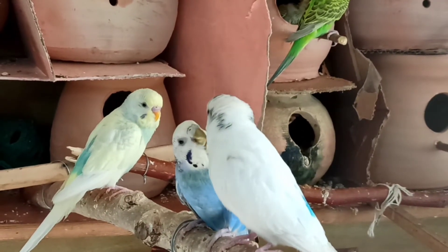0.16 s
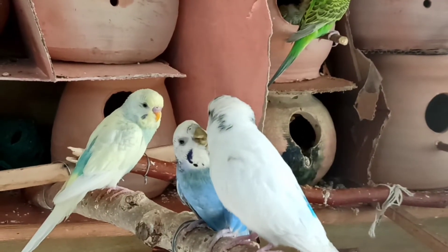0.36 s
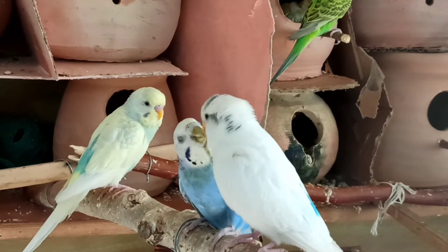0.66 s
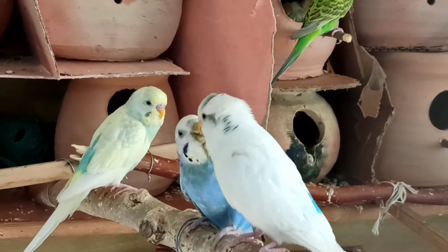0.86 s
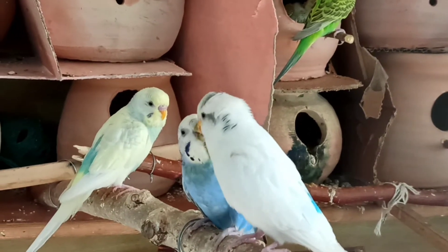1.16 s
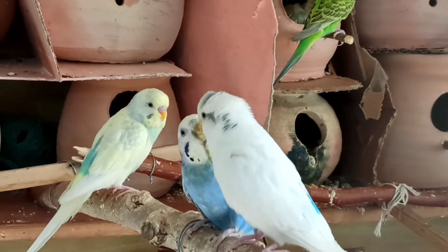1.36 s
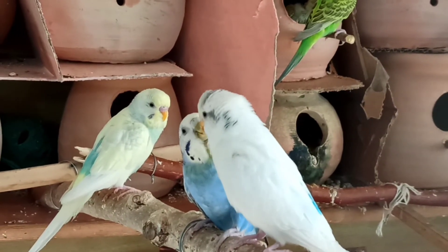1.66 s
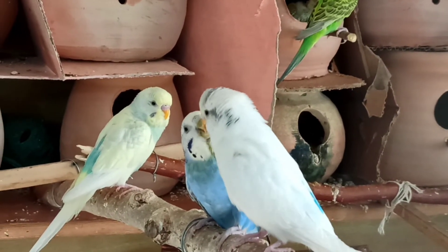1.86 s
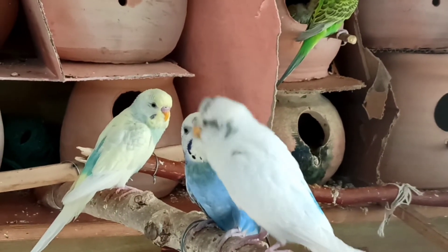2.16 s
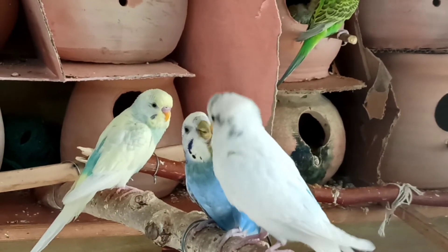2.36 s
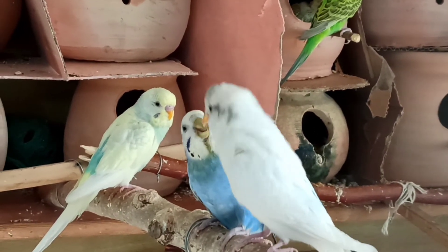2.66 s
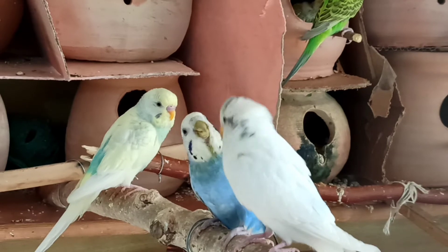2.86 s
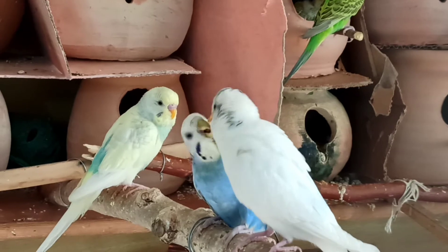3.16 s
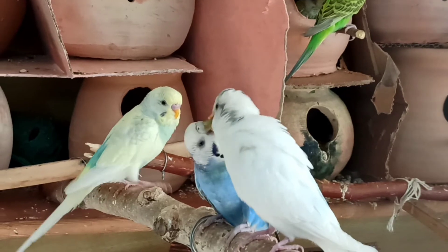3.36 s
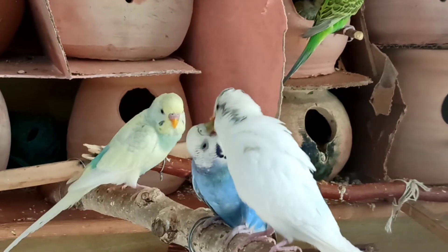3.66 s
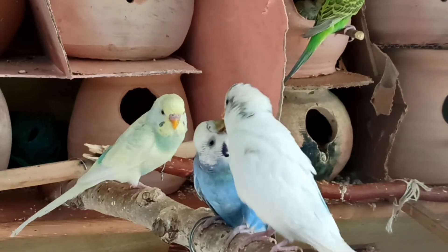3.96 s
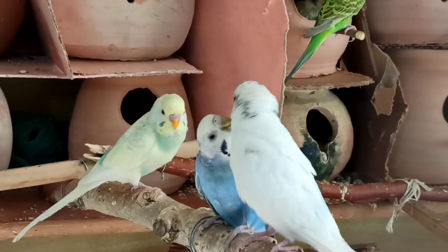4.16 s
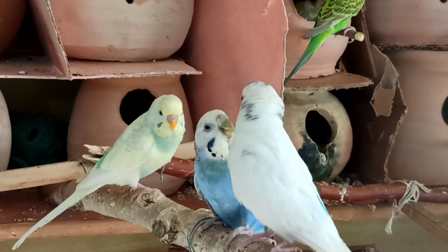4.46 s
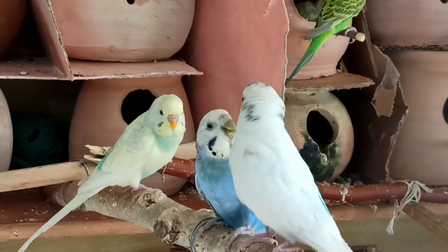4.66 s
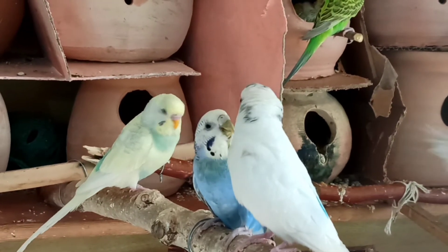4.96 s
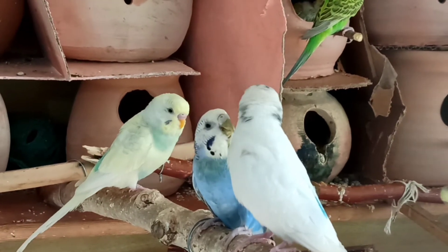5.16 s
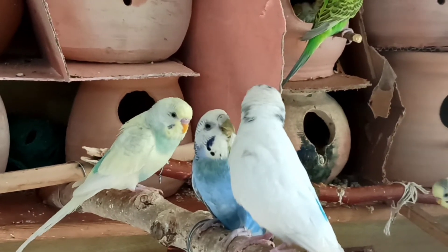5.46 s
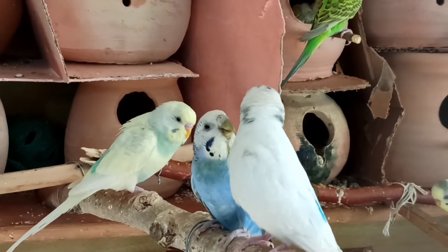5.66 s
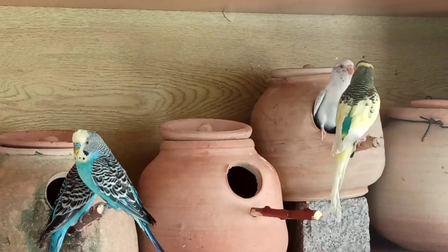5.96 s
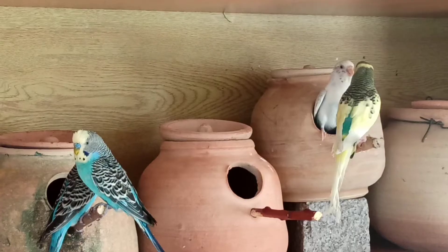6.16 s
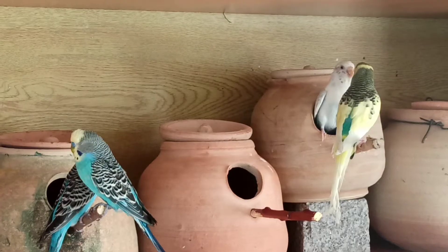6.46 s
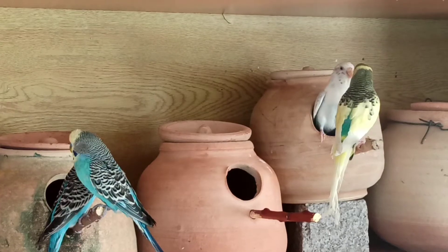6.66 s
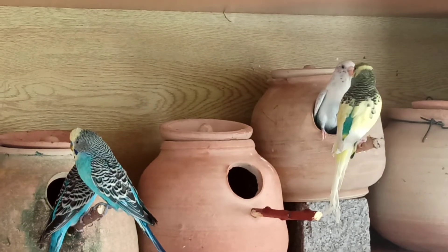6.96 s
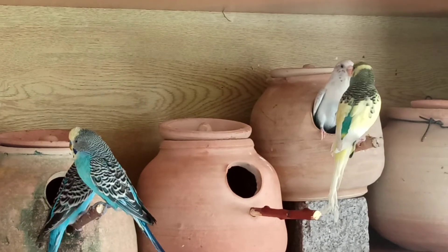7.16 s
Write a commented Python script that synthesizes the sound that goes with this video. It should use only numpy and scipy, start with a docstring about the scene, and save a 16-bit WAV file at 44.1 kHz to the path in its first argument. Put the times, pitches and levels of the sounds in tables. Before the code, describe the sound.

Small parrots in an aviary, heard by a close stereo microphone. Harsh dry rasps repeat at the centre from the start, pausing around two seconds for buzzy trills and a clear whistle leaning left, then a loud leaping chirp. Rasping returns in clusters, with short whistles and perch ticks. Towards the end a busy flurry of small chirps takes over. Far chatter, open-air hiss and light wind rumble continue throughout.

```python
"""Small parrots in an aviary: harsh scolding rasps close by, loud warbled chirps, whistles and buzzy trills
left and right, ticks, soft hoots, a far chatter, open-air hiss, a thin hum and wind rumbling on the microphone.
Rasps are bursts gating shaky tones and breath noise; chirps are overtones plus breath; whistles are near sines;
trills are chopped sines; ticks are snaps of filtered noise; chatter is a crowd of short bent notes.
Hiss and wind are shaped noise; sparse decaying echoes make the aviary."""
import sys
import numpy as np
from scipy import signal
from scipy.io import wavfile
from scipy.ndimage import uniform_filter1d

SR = 44100
rng = np.random.default_rng(int(sys.argv[2]) if len(sys.argv) > 2 else 0)


def pcm_store(signal):
    """Save signal as 16-bit PCM."""
    levels = np.round(np.clip(np.atleast_2d(signal), -1, 1) * 32767)
    wavfile.write(sys.argv[1], SR, levels.astype(np.int16).T)


def rack_gain(trim_db):
    """Turn a fader trim in dB into the linear factor to multiply a signal by."""
    fader = np.asarray(trim_db, float)
    return 10 ** (fader / 20)


N = 321489

# Open-air hiss spectrum. Each row: frequency in Hz, relative density in dB per Hz.
AIR_COLOUR = [(24, -58), (40, -48), (118, -63.5), (402, -28), (455, -17.5), (770, 2.5), (1440, -0.5),
              (1720, 1), (3380, -2), (5310, -4), (7360, -3), (13800, -10.5), (16000, -13)]
AIR_DB = -38
# Left-right likeness of the hiss. Each row: frequency in Hz, likeness from 0 to 1.
AIR_LIKENESS = [(60, 0.98), (180, 0.4), (550, 0.48), (1650, 0.66), (4970, 0.35), (15000, 0.043)]
# Wind level. Each row: time in seconds, level in dB.
WIND_LEVEL = [(0.0, -46), (0.08, -58), (0.12, -62), (0.3, -61), (0.36, -54.5), (0.93, -44), (1.12, -66),
              (1.68, -60), (2.01, -47.5), (2.33, -66), (3.44, -60), (4.03, -67), (4.24, -43), (4.58, -39),
              (4.95, -61.5), (5.17, -50), (5.27, -65.5), (7.28, -62.5)]
# Wind spectrum. Each row: frequency in Hz, relative density in dB per Hz.
WIND_COLOUR = [(18, -61), (30, -34), (48, -35), (85, 5.5), (108, -17), (146, -0.5), (600, -17), (780, -44),
               (1320, -120)]
# The wind rings one low resonance; level relative to the gusts.
MOAN_HZ, MOAN_WIDTH_HZ, MOAN_REL_DB = 97.2, 4.3, -10.5
HUM_HZ, HUM_DB = 1726, -55

# Far flock, before its direct and echo gains. Each row: time in seconds, level in dB.
CHATTER_LEVEL = [(0.0, -41.5), (0.87, -41.5), (2.27, -49.5), (2.56, -42.5), (2.9, -43), (5.16, -50),
                 (6.29, -42), (7.29, -42.5)]
FAR_DIRECT_DB, FAR_ECHO_DB = -6, -3
# Aviary decay. Each row: frequency in Hz, time to fall 60 dB in seconds.
AVIARY_T60 = [(1000, 0.033), (3000, 0.27), (7000, 0.26), (14000, 0.12)]

# Low soft hoots far off. Each row: start in seconds, length in seconds, settled level in dB,
# first pitch in Hz, last pitch in Hz, left over right in dB.
HOOTS = [(0.097, 0.095, -47.5, 309, 362, 0), (3.065, 0.18, -64, 325, 321, 0),
         (3.368, .26, -64, 334, 297, -2)]
# Short whistles, one glide each. Columns as for the hoots.
WHISTLES = [(0, 0.024, -35.5, 2950, 2840, 5), (0.047, 0.11, -46.5, 2950, 2900, 12),
            (.17, 0.053, -40, 3040, 2845, 7), (0.247, .02, -38, 1350, 1600, -2),
            (.265, 0.029, -39, 1515, 1140, -2), (.34, .13, -40.5, 1495, 1464, -2),
            (0.38, 0.023, -33, 1715, 1490, -2), (1.235, 0.036, -34, 2860, 3300, 0),
            (1.322, 0.021, -31, 3425, 3240, 0), (1.434, 0.0082, -29.5, 3540, 2790, 0),
            (1.52, .025, -35.5, 2650, 3160, 0), (1.954, 0.11, -42, 8230, 7820, 26),
            (2.04, 0.074, -43.5, 3906, 3835, 4), (2.067, 0.038, -41.5, 2410, 2250, 0),
            (2.332, .05, -45, 3380, 3300, 0), (2.368, 0.066, -45.5, 1200, 1435, 0),
            (2.439, 0.028, -31, 3710, 3500, -2), (2.507, 0.034, -36, 1785, 1750, -2),
            (2.97, 0.036, -38.5, 1450, 1453, 0), (3.45, 0.024, -38, 2790, 2760, 0),
            (3.647, 0.046, -42, 4050, 4190, -1), (3.677, .03, -40, 1550, 1620, 0),
            (3.717, 0.028, -36, 4170, 4400, -1), (3.75, 0.044, -44, 4640, 4720, 0),
            (3.775, 0.028, -29.5, 2680, 4290, 0), (3.884, 0.031, -47, 4610, 4700, 5),
            (3.989, 0.045, -40, 2640, 2280, 1), (4.062, 0.044, -38, 2730, 2200, 0),
            (4.708, .03, -40.5, 2380, 2420, -7), (5.171, 0.014, -35, 4120, 4150, 0),
            (5.314, 0.088, -50, 1416, 1116, -3), (5.76, 0.041, -42, 5130, 4950, -24),
            (5.307, 0.034, -42, 5350, 4720, -22), (5.561, 0.0444, -35.5, 3520, 2860, -1),
            (5.595, 0.044, -41.5, 4960, 5100, -28), (4.566, 0.089, -47.5, 6200, 5000, -20),
            (4.712, .035, -49, 4840, 4750, -22), (4.91, 0.032, -53, 4300, 4250, -20),
            (5.007, 0.086, -54, 5240, 5350, -20), (6.02, .05, -46, 5140, 4800, -20),
            (6.43, 0.071, -43.5, 3020, 3350, -18), (6.595, .045, -40.5, 4770, 5200, -22),
            (0.582, 0.066, -43, 2600, 2950, 10), (0.988, 0.128, -43.5, 2890, 2950, 12),
            (1.29, 0.044, -39, 2605, 2650, 0), (1.56, .04, -46, 2840, 3050, 0),
            (4.182, 0.042, -37.5, 2600, 2350, 0), (5.861, 0.035, -43, 2530, 2800, 0),
            (5.871, 0.011, -31, 4140, 4350, 0), (5.887, 0.025, -35, 3320, 2930, 0),
            (5.899, 0.057, -39, 4870, 4630, -12), (5.924, 0.014, -33, 2010, 2320, 0),
            (5.939, .025, -33, 2414, 3390, -1), (5.975, 0.015, -37, 4000, 4400, 0),
            (5.964, 0.019, -36, 2035, 2035, -2), (5.999, 0.031, -33, 2425, 3190, 0),
            (6.003, 0.029, -37, 5200, 6360, 0), (6.013, 0.029, -33.5, 6450, 6470, -1),
            (6.061, 0.026, -38.5, 2650, 3220, -2), (6.083, .085, -46, 2600, 2410, -3),
            (6.089, 0.03, -39.5, 3650, 3640, 0), (6.173, .04, -42, 3000, 3000, 0),
            (6.21, 0.076, -42, 1200, 1135, -2), (6.33, .04, -43, 2790, 2680, -13),
            (6.515, .015, -38, 3950, 3600, 0), (6.567, 0.044, -41, 2600, 2880, 0),
            (6.639, 0.053, -40, 3410, 3080, -24), (6.715, .015, -40, 4810, 4700, -15),
            (6.757, 0.12, -44, 3430, 3240, 0), (6.789, 0.014, -39, 4890, 4650, -20),
            (6.99, 0.023, -46, 5450, 5400, -15), (7.02, .04, -36.5, 3300, 3450, 0),
            (6.529, 0.034, -40, 3090, 2690, -3), (7.02, 0.083, -42, 2600, 2436, -6),
            (7.203, 0.11, -45, 8050, 7430, -24), (7.208, 0.038, -37, 2900, 3400, 0)]
# Hoots and short whistles settle at this share of the length; start and end relative to the settled level.
SETTLE_SHARE, GLIDE_START_REL_DB, GLIDE_END_REL_DB = 0.091, 6, -3.5
# Longer whistled phrases. Each row: left over right in dB, then a list of points:
# time in seconds, pitch in Hz, level in dB.
PHRASES = [(6, [(1.14, 818, -43.5), (1.22, 870, -48), (1.28, 840, -50), (1.36, 880, -49.5),
           (1.45, 871, -50), (1.52, 850, -48), (1.65, 825, -50.5)]), (15, [(2.44, 5300, -28.5),
           (2.48, 5790, -27.5), (2.53, 5740, -36), (2.6, 5650, -39), (2.69, 5860, -54)]),
           (-1, [(2.47, 3190, -30), (2.5, 3607, -25.5), (2.53, 3620, -27), (2.58, 3640, -42)]),
           (17, [(2.582, 4120, -29), (2.6, 4115, -19), (2.655, 4135, -25), (2.7, 4160, -38),
           (3.1, 4205, -51.5)]), (0, [(3.18, 3680, -49), (3.22, 3370, -37), (3.26, 3325, -34),
           (3.3, 3350, -41)]), (5, [(3.43, 3390, -39), (3.5, 3086, -40), (3.53, 2800, -43),
           (3.58, 2810, -39)]), (0, [(3.6, 2850, -50), (3.67, 3000, -41), (3.7, 3200, -32.5),
           (3.72, 2900, -39), (3.745, 2750, -39)]), (0, [(3.73, 2140, -37.5), (3.77, 2420, -37.5),
           (3.81, 2316, -42), (3.93, 2520, -43.5)]), (-27, [(6.18, 4150, -63), (6.25, 4710, -42),
           (6.28, 5340, -51), (6.31, 4940, -45)]), (3, [(6.2, 2616, -35.5), (6.24, 2166, -43),
           (6.3, 2286, -39), (6.35, 2200, -44)])]
FLUTTER_DB = 2.5

# Buzzy trills. Each row: start in seconds, length in seconds, top level in dB, averaged over the chopping,
# pitch in Hz, left over right in dB.
TRILLS = [(2.11, .27, -28.5, 6024, 17), (2.285, 0.38, -25.5, 4065, 15)]
TRILL_PER_S = 230  # nominal
TRILL_RISE_S, TRILL_START_REL_DB, TRILL_FALL_DB_PER_S = 0.041, -11, 79

# Beaks and claws tick on perches. Each row: time in seconds, peak in dB, left over right in dB.
TICKS = [(1.5494, -33, -7), (1.829, -27, -7), (4.8206, -27.5, -15), (5.096, -26.5, -21),
         (5.2533, -15.5, 23), (6.705, -25.5, -22), (6.9486, -30, -12)]

# A bird on the right repeats one rough rising note.
REPEAT_FIRST_S, REPEAT_LENGTH_S, REPEAT_SPACING_S = 5.085, .04, .203
REPEAT_FROM_HZ, REPEAT_TO_HZ = 3500, 4150
REPEAT_DB, REPEAT_ROUGH, REPEAT_LEFT_DB = -39, .5, -20  # roughness 0-1

# Loud warbled chirps. Each row: left over right in dB, then a list of points:
# time in seconds, pitch in Hz, level in dB, roughness from 0 to 1.
CHIRPS = [(2, [(2.692, 2770, -25, 0.1), (2.698, 2640, -23, 0), (2.7, 4900, -23, 0), (2.703, 2890, -25, 0.1),
          (2.706, 2970, -31, 0.3), (2.708, 4950, -12, 0.05), (2.711, 2820, -35, 0.2), (2.713, 5140, -12, 0),
          (2.718, 5150, -9.5, 0.07), (2.722, 4260, -28, 0), (2.733, 4990, -8, 0)]),
          (1.7, [(2.735, 4135, -32, 0.6), (2.745, 2980, -23.5, 0.05), (2.755, 2593, -18.5, 0),
          (2.779, 2473, -22, 0), (2.781, 4690, -10, 0), (2.783, 5150, -7, 0.15), (2.786, 6330, -10, 0.27),
          (2.792, 4910, -14.5, 0.15), (2.795, 3160, -15.5, 0), (2.799, 4990, -14, 0.1),
          (2.806, 5080, -15, 0.06), (2.815, 4750, -24, 0.2)]), (0, [(2.818, 4740, -25, 0.27),
          (2.83, 4880, -23, 0.07), (2.84, 4760, -16.5, 0.03), (2.855, 4410, -23, 0.2),
          (2.87, 4200, -39, 0.2)]), (-0.5, [(7.018, 4130, -39, 0.1), (7.036, 3760, -36, 0.14),
          (7.052, 4150, -23, 0.3), (7.062, 4600, -29, 0.77), (7.085, 4350, -24, 0.82),
          (7.105, 4280, -33, 1)])]
# Throat response to the overtones. Each row: frequency in Hz, gain in dB.
CHIRP_THROAT = [(2000, -3), (2700, -4), (5000, -1.5), (7500, -5.5), (10000, -15), (13000, -13.5),
                (16000, -67)]

# Harsh rasps. Each row: start in seconds, swell in seconds, level at the onset in dB, level after the swell
# in dB, lower resonance relative to upper in dB, upper throat resonance in Hz, lower throat resonance in Hz.
RASPS = [(0.164, 0.029, -37, -40, 6, 6430, 3460), (0.316, 0.055, -31, -21.5, -9.5, 6550, 3900),
         (0.464, 0.026, -18.5, -25.5, -7.5, 6380, 4000), (.5, 0.057, -31, -26, -5, 6380, 4138),
         (.618, 0.056, -24, -25.5, 0.5, 6520, 3840), (.72, 0.059, -33, -30, 2, 6440, 4030),
         (.765, 0.033, -23.5, -25.5, -3.5, 6360, 4230), (.82, 0.06, -32, -30.5, -8.5, 6350, 3760),
         (.93, 0.06, -20, -26, -5, 6460, 4420), (1.056, 0.059, -24, -25, -3, 6450, 4110),
         (1.189, 0.048, -23, -24, -8, 6400, 3600), (1.317, 0.044, -21, -25.5, -7.5, 6610, 3720),
         (1.619, 0.052, -23, -23.5, -8.5, 6540, 3960), (2.961, 0.043, -40, -31.5, 2, 6580, 4170),
         (3.211, 0.044, -31, -24.5, -6, 6540, 3720), (3.33, 0.06, -22.5, -25, -9.5, 6360, 3600),
         (3.784, 0.024, -39, -41, 10.5, 6990, 3330), (4.012, 0.039, -22, -26.5, -7.5, 6610, 4060),
         (4.127, .085, -21, -26.5, -7, 6770, 3750), (4.245, 0.025, -19.5, -23, -10, 6240, 4160),
         (4.43, 0.056, -26, -26.5, -2, 6170, 3730), (5.149, 0.012, -30, -30.5, -1, 6370, 3700),
         (5.25, 0.011, -32, -38.5, 6.5, 6540, 3450), (5.437, 0.019, -28, -25.5, -6.5, 6270, 4550),
         (5.463, 0.011, -28, -31.5, 7, 6700, 3300), (5.872, 0.009, -39, -37.5, 3, 6400, 3560),
         (5.94, 0.055, -39, -43.5, 8.5, 6440, 3620), (6.36, 0.06, -29, -35, -5.5, 6620, 3770),
         (6.451, 0.021, -29, -33.5, -6, 6270, 3540), (6.61, .03, -38, -38.5, 0, 6200, 3720)]
# Breath in the lower throat. Each row: multiple of the lower resonance, width in Hz, relative level in dB.
LOWER_THROAT = [(1.0, 1610, 40.5), (1.25, 400, 28.5), (.68, 300, -37)]
# Resonances of the head, drifting as it moves. Each row: centre in Hz, width in Hz, relative level in dB.
HEAD = [(5470, 160, -3.5), (7364, 260, 0), (8310, 240, -4.5), (11800, 500, -19), (13100, 1300, -11.5),
        (4540, 120, -3)]
HEAD_DRIFT = .035  # rms share of the centre
UPPER_WIDTH_HZ = 930
RASP_START_PER_S, RASP_LATER_PER_S = 190, 380  # nominal burst rates
RASP_LEFT_DB, RASP_RISE_S = -0.5, 0.0061
# The voice breaks off, then dies away; longer rasps more slowly. Both drops are below the level after the swell.
RASP_CUT_S, RASP_CUT_DROP_DB = 0.018, 4.5
RASP_FALL_S, RASP_FALL_PER_SWELL, RASP_FALL_DROP_DB = 0.027, 1.3, 18
LOWER_FOLLOWS = 0.71  # share of the change in effort, in dB, that reaches the lower resonance

FADE_S = .004
LOW_CUT_HZ, MONO_BELOW_HZ, EDGE_HZ = 112, 460, 15900
KNEE, CEILING = .6, .92  # full scale = 1


def evened(x):
    """Scales to rms 1."""
    return x / np.sqrt(np.mean(x ** 2) + 1e-20)


def read(points, hz):
    """Reads a table against log frequency."""
    f, value = np.transpose(points)
    return np.interp(np.log(hz + 1), np.log(f + 1), value)


def level_over_time(points):
    """Level in dB at every sample of the scene."""
    return np.interp(np.arange(N) / SR, *np.transpose(points))


def curves(rows):
    """Start time and each column of a table, sample by sample."""
    s, *columns = np.transpose(rows)
    t = np.arange(s[0], s[-1], 1 / SR)
    return s[0], [np.interp(t, s, c) for c in columns]


def wobble(n, size):
    """Smooth random drift of rms 1; size in samples."""
    return evened(uniform_filter1d(uniform_filter1d(rng.standard_normal(n), size), size))


def phase(hz):
    """Running phase in radians of a pitch curve."""
    return 2 * np.pi * np.cumsum(hz) / SR


def add(mix, s, sound, left_db, fade_s=FADE_S):
    """Places a sound left or right, with soft ends."""
    sound = sound * signal.windows.tukey(len(sound), min(1, 2 * fade_s * SR / len(sound)))
    ratio = rack_gain(left_db)
    pair = np.array([2 * ratio / (1 + ratio) * sound, 2 / (1 + ratio) * sound])
    part = mix[:, round(s * SR):][:, :len(sound)]
    part += pair[:, :part.shape[1]]


def resonate(x, hz, width_hz):
    """Moving resonance: shifts the curve hz down to zero, smooths twice, shifts back."""
    turn = np.exp(1j * phase(hz * np.ones(len(x))))
    r = np.exp(-np.pi * width_hz / SR)
    return 2 * (turn * signal.lfilter([(1 - r) ** 2], [1, -2 * r, r * r], x / turn)).real


def noise(colour, likeness, patchy_db):
    """Two channels of coloured noise with drifting patches, rms 1."""
    frames, hz = N // 256 + 5, np.fft.rfftfreq(1024, 1 / SR)
    a, b, c, d, patches = rng.standard_normal((frames, 513, 5)).T
    patches = evened(uniform_filter1d(uniform_filter1d(patches, 12, 0), 10, 1))
    same = np.clip(likeness(hz), -1, 1)[:, None]
    left = a + 1j * b
    right = same * left + np.sqrt(1 - same ** 2) * (c + 1j * d)
    z = np.array([left, right]) * rack_gain(read(colour, hz)[:, None] + patchy_db * patches)
    return evened(signal.istft(z, nperseg=1024, noverlap=768)[1][:, :N])


def hiss():
    """Open-air hiss: patchy shaped noise, partly shared by the two channels."""
    return rack_gain(AIR_DB) * noise(AIR_COLOUR, lambda hz: read(AIR_LIKENESS, hz), patchy_db=1.83)


def wind():
    """Gusts on the microphone: low noise, alike left and right, plus one ringing resonance."""
    gusts = noise(WIND_COLOUR, np.ones_like, patchy_db=3)
    moan = evened(resonate(rng.standard_normal(N), MOAN_HZ, MOAN_WIDTH_HZ))
    return rack_gain(level_over_time(WIND_LEVEL)) * (gusts + rack_gain(MOAN_REL_DB) * moan)


def hum():
    """A thin sine wavering in level and phase."""
    level = rack_gain(HUM_DB + 2.6 * wobble(N, size=4000))
    return level * np.sin(2 * np.pi * HUM_HZ * np.arange(N) / SR + 0.21 * wobble(N, size=3000))


def chatter(count=1000):
    """Far birds: a crowd of short bent, warbled notes at random moments and places."""
    mix = np.zeros((2, N))
    for when, pitch, slope, bend, length, size, side in rng.random((count, 7)):
        t = np.linspace(-1, 1, int((0.0135 + 0.0345 * length) * SR))
        octaves = 1.4 * pitch + .35 * (slope - .5) * t + .35 * (bend - .5) * t ** 2
        note = np.sin(phase(1700 * 2 ** octaves)) * np.cos(np.pi * t / 2)
        add(mix, when * N / SR, rack_gain(9 * size) * note, 16 * (side - .5))
    return evened(mix) * rack_gain(level_over_time(CHATTER_LEVEL))


def aviary(x, same):
    """Sparse echoes of random sign, each band dying at its own speed, different in each ear."""
    taps = np.zeros((2, SR // 2))
    at = np.arange(150, SR // 2 - 20, 20) + rng.integers(0, 20, (2, (SR // 2 - 151) // 20))
    np.put_along_axis(taps, at, rng.choice([-1., 1.], at.shape), 1)
    taps[1] = same * taps[0] + np.sqrt(1 - same ** 2) * taps[1]
    hz, t, z = signal.stft(taps, SR, nperseg=256)
    decay = rack_gain(-60 * t / read(AVIARY_T60, hz)[:, None])
    tail = signal.istft(z * decay, SR, nperseg=256)[1]
    return signal.oaconvolve(x, tail / np.linalg.norm(tail[0]), axes=1)[:, :N]


def glide(s, length_s, settled_db, from_hz, to_hz):
    """Points of one straight glide that starts with a push, settles and fades."""
    return [(s, from_hz, settled_db + GLIDE_START_REL_DB),
            (s + SETTLE_SHARE * length_s, from_hz + SETTLE_SHARE * (to_hz - from_hz), settled_db),
            (s + length_s, to_hz, settled_db + GLIDE_END_REL_DB)]


def whistle(rows):
    """A near sine that wavers in pitch and strength, with a faint octave."""
    s, (hz, db) = curves(rows)
    n = len(hz)
    turn = phase(hz * (1 + .005 * wobble(n, size=200)))
    db = db + FLUTTER_DB * wobble(n, size=500) + 2.4 * wobble(n, size=150)
    tone = np.sin(turn) + rack_gain(-38) * np.sin(2 * turn)
    return s, np.sqrt(2) * rack_gain(db) * tone


def trill(s, length_s, top_db, hz, left_db):
    """A whistle chopped by a second, slower and uneven vibration."""
    t = np.arange(0, length_s, 1 / SR)
    rise_db = TRILL_START_REL_DB * (1 - t / TRILL_RISE_S)
    fall_db = TRILL_FALL_DB_PER_S * (TRILL_RISE_S - t)
    beat = phase(TRILL_PER_S * (1 + 0.178 * wobble(len(t), size=300)))
    turn = phase(hz * (1 + 0.017 * np.sin(beat) + 0.013 * wobble(len(t), size=100)))
    chopped = evened((1 + .6 * np.cos(beat)) * np.sin(turn))
    return s, rack_gain(top_db + np.minimum(rise_db, fall_db)) * chopped, left_db


def tick(peak_db):
    """A dry snap with a short bright rattle: decaying resonant noise, differentiated."""
    t = np.arange(1200) / SR
    snap = np.diff(resonate(rng.standard_normal(len(t)), 3800, 4400) * rack_gain(-60 * t / 0.027))
    return rack_gain(peak_db) * snap / abs(snap).max()


def repeated(count=5):
    """Points of the same note at even spacing, bending up fast and then holding."""
    bend = ((0, REPEAT_FROM_HZ), (.5, REPEAT_TO_HZ), (1, REPEAT_TO_HZ))  # share of length, Hz
    starts = REPEAT_FIRST_S + REPEAT_SPACING_S * np.arange(count)
    return [[(s + u * REPEAT_LENGTH_S, hz, REPEAT_DB, REPEAT_ROUGH) for u, hz in bend] for s in starts]


def chirp(rows):
    """Fast pitch leaps; the throat weighs the overtones, roughness shakes the voice and adds breath."""
    s, (hz, db, rough) = curves(rows)
    n = len(hz)
    turn = phase(hz * (1 + 0.067 * rough * wobble(n, size=30)))
    gains = [rack_gain(read(CHIRP_THROAT, k * hz) - 1.0 * k) * (k * hz < SR / 2) for k in range(1, 6)]
    tone = sum(g * np.sin(k * turn) * (1 - rough) ** (k - 1) for k, g in enumerate(gains, 1))
    tone = tone / np.sqrt(sum(g ** 2 for g in gains))
    air = rng.standard_normal(n)
    breath = evened(resonate(air, 0.88 * hz, 1000)) + rack_gain(-5.5) * evened(resonate(air, 1.75 * hz, 1000))
    voice = tone + (.1 + .35 * rough) * breath
    return s, np.sqrt(2) * rack_gain(db + 4 * rough * wobble(n, size=60)) * voice


def rasp_bursts(n):
    """Soft uneven bursts that speed up, over a small steady flow."""
    settling = np.exp(-np.arange(n) / (.04 * SR))
    rate = RASP_LATER_PER_S + (RASP_START_PER_S - RASP_LATER_PER_S) * settling
    turns = np.cumsum(rate * np.exp(0.33 * wobble(n, size=120))) / SR + 1
    pulses = np.diff(np.floor(turns), prepend=0) * rack_gain(1.5 * rng.standard_normal(n))
    return signal.oaconvolve(pulses, np.hanning(round(.0028 * SR)))[:n] + .16


def rasp(s, swell_s, onset_db, top_db, lower_rel_db, upper_hz, lower_hz):
    """Bursts gate two shaky tones and breath noise ringing in the throat and head."""
    t = np.arange(0, swell_s + RASP_FALL_S + RASP_FALL_PER_SWELL * swell_s, 1 / SR)
    n = len(t)
    below_db = np.interp(t, [0, swell_s, swell_s + RASP_CUT_S, t[-1]],
                         [top_db - onset_db, 0, RASP_CUT_DROP_DB, RASP_FALL_DROP_DB])
    effort = np.minimum(t / RASP_RISE_S, 1) * rack_gain(top_db - below_db)
    bursts = rasp_bursts(n)
    breath = bursts * rng.standard_normal(n)
    high = bursts * np.sin(phase(upper_hz * (1 + 0.0404 * wobble(n, size=50))))
    low = bursts * np.sin(phase(lower_hz * (1 + 0.18 * wobble(n, size=350))))  # wanders more slowly

    upper = 2.9 * evened(high) + evened(resonate(breath, upper_hz, UPPER_WIDTH_HZ))
    for hz, width_hz, db in HEAD:
        drifting_hz = hz * (1 + HEAD_DRIFT * wobble(n, size=900))
        upper = upper + rack_gain(db) * evened(resonate(breath, drifting_hz, width_hz))
    lower = 1.2 * evened(low)
    for multiple, width_hz, db in LOWER_THROAT:
        lower = lower + rack_gain(db) * evened(resonate(breath, multiple * lower_hz, width_hz))
    lower_gain = rack_gain(lower_rel_db + (1 - LOWER_FOLLOWS) * below_db)
    return s, effort * (evened(upper) + lower_gain * evened(lower))


def scene():
    """Rasps and loud chirps are driest; whistles, trills and the far flock carry more of the aviary."""
    scolding, close, ahead, aside = np.zeros((4, 2, N))
    far = chatter()
    glides = [(row[-1], glide(*row[:-1])) for row in WHISTLES + HOOTS]
    for left_db, rows in PHRASES + glides:
        add(aside if abs(left_db) > 10 else ahead, *whistle(rows), left_db)
    for row in TRILLS:
        add(aside, *trill(*row))
    for rows in repeated():
        add(aside, *chirp(rows), REPEAT_LEFT_DB)
    for s, peak_db, left_db in TICKS:
        add(close, s, tick(peak_db), left_db, fade_s=0)
    for left_db, rows in CHIRPS:
        add(close, *chirp(rows), left_db, fade_s=0.00083)
    for row in RASPS:
        add(scolding, *rasp(*row), RASP_LEFT_DB)

    sends = rack_gain(-6.5) * close + rack_gain(-3.5) * ahead + rack_gain(-3.5) * aside + rack_gain(FAR_ECHO_DB) * far
    echoes = aviary(sends, same=.5) + aviary(rack_gain(-8.5) * scolding, same=.9)
    birds = scolding + close + ahead + aside + rack_gain(FAR_DIRECT_DB) * far
    return birds + echoes + hiss() + wind() + hum()


def roll_off(x):
    """The treble ends steeply here."""
    return signal.sosfilt(signal.butter(12, 17040, fs=SR, output="sos"), x)


def record(dry):
    """A close pair of microphones: no deep bass, no stereo in the bass, soft overload, a band limit."""
    mid, side = (dry[0] + dry[1]) / 2, (dry[0] - dry[1]) / 2
    mid = signal.sosfilt(signal.butter(3, LOW_CUT_HZ, "high", fs=SR, output="sos"), mid)
    side = signal.sosfiltfilt(signal.butter(4, MONO_BELOW_HZ, "high", fs=SR, output="sos"), side)
    pair = np.array([mid + side, mid - side])
    over, room = np.maximum(abs(pair) - KNEE, 0), CEILING - KNEE
    pair = pair - np.sign(pair) * (over - room * np.tanh(over / room))  # the loudest peaks round off
    edge = signal.firwin(511, EDGE_HZ, window=("kaiser", 9), fs=SR)
    pair = signal.oaconvolve(pair, edge[None], "same", axes=1)
    return roll_off(pair)


dry = scene()
out = record(dry)
pcm_store(out)
```